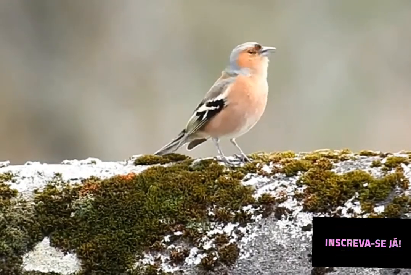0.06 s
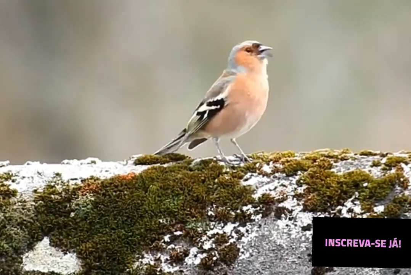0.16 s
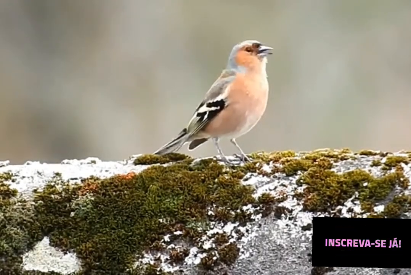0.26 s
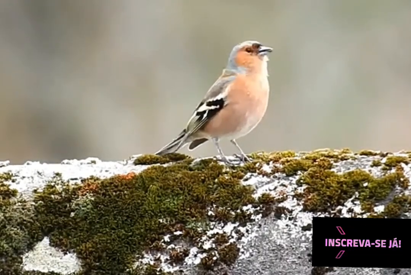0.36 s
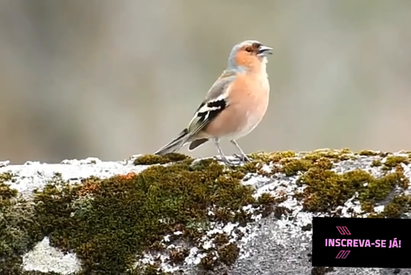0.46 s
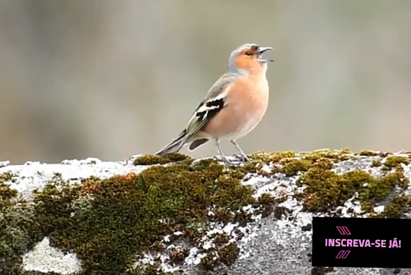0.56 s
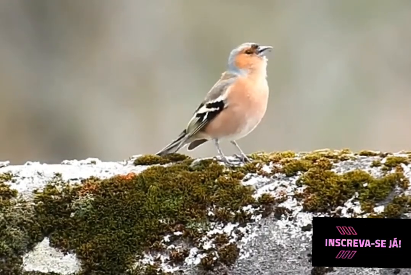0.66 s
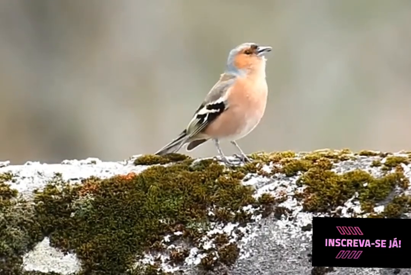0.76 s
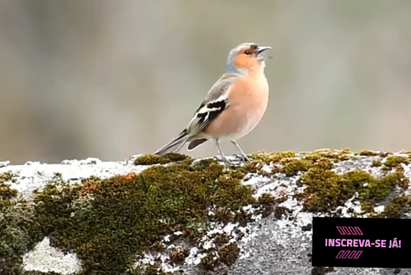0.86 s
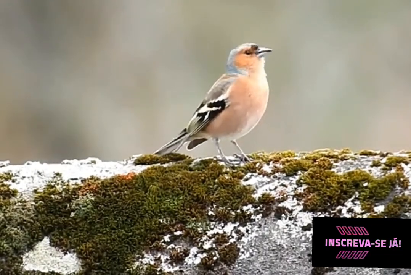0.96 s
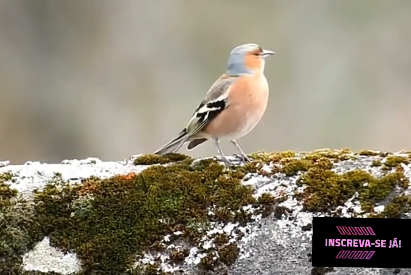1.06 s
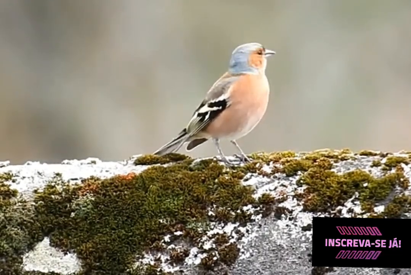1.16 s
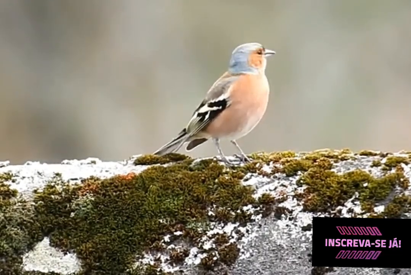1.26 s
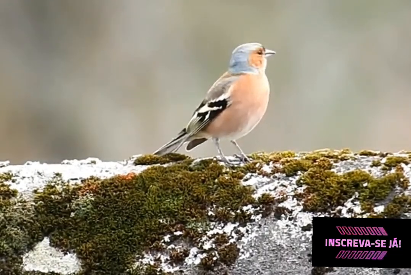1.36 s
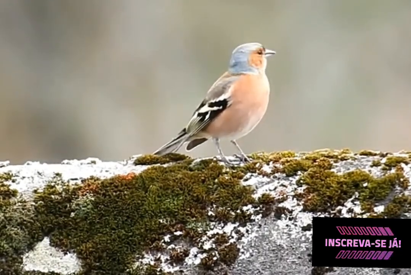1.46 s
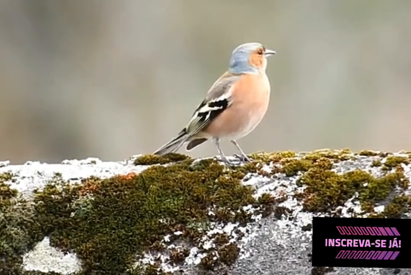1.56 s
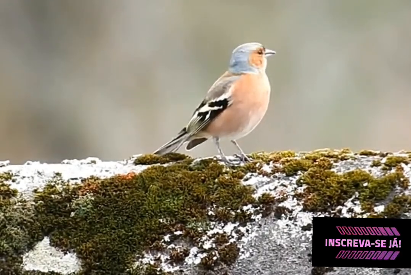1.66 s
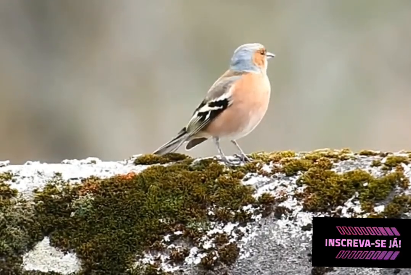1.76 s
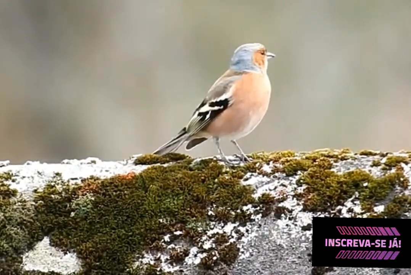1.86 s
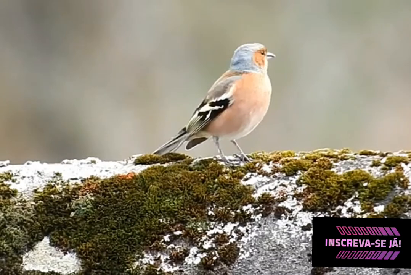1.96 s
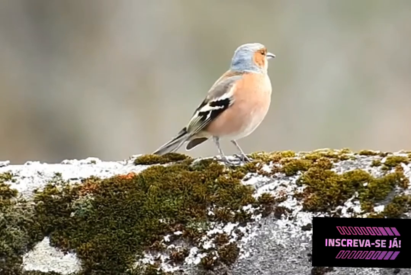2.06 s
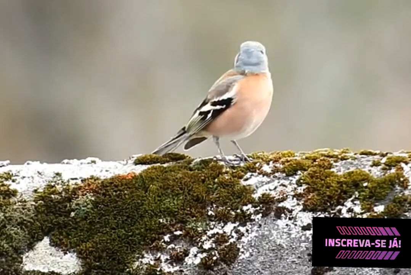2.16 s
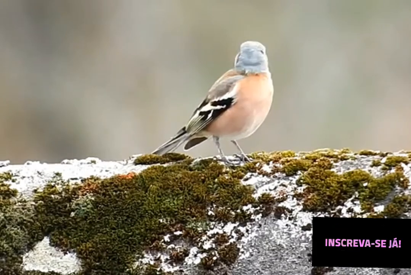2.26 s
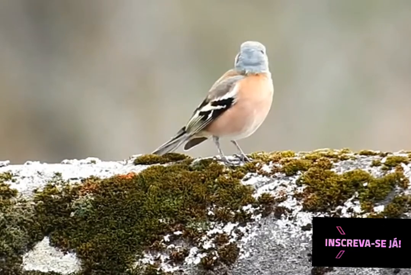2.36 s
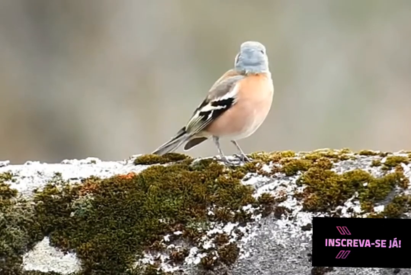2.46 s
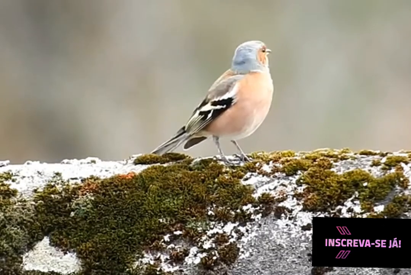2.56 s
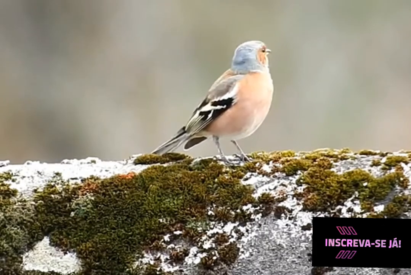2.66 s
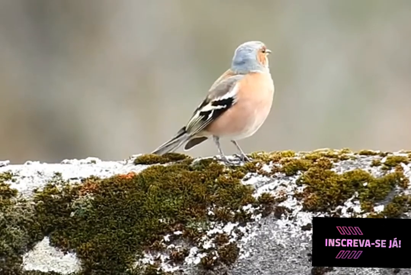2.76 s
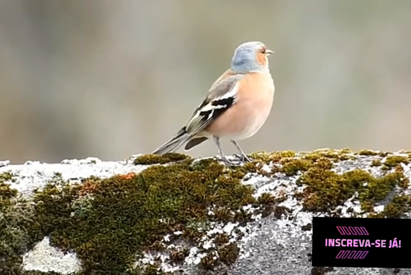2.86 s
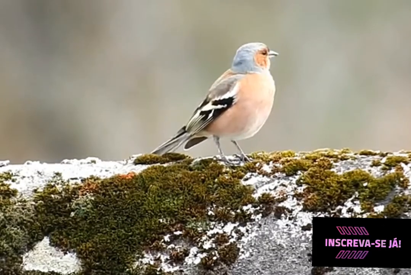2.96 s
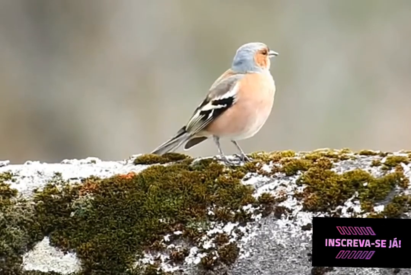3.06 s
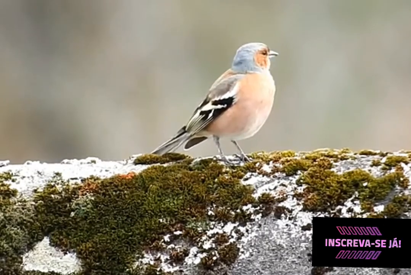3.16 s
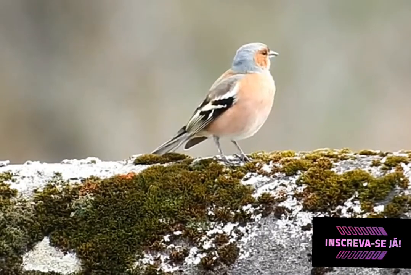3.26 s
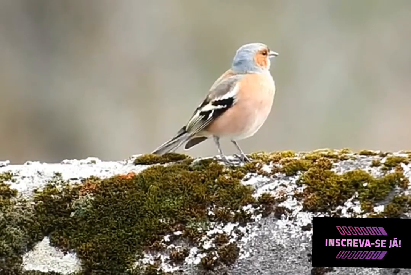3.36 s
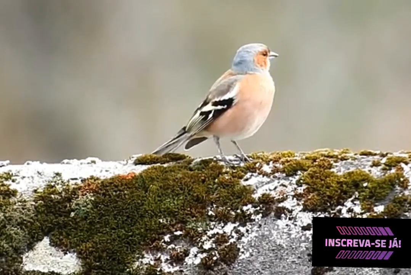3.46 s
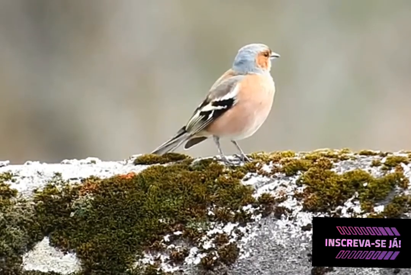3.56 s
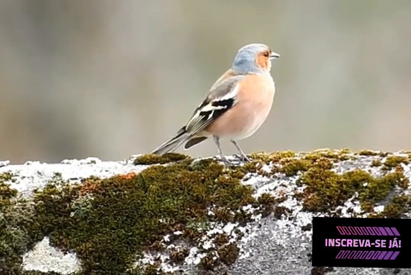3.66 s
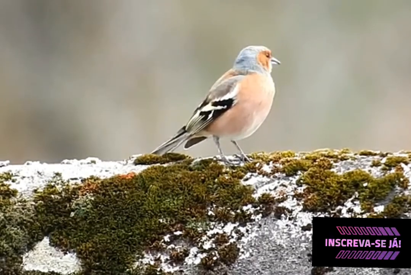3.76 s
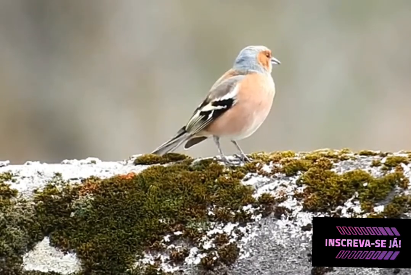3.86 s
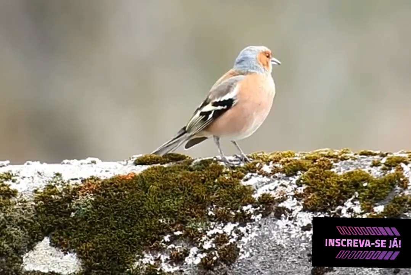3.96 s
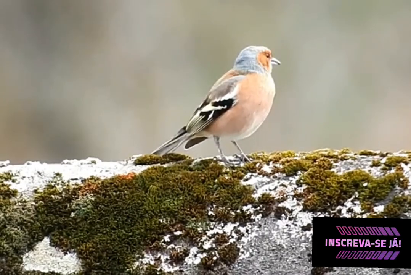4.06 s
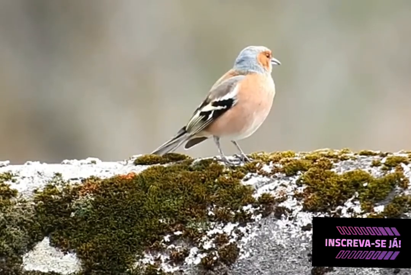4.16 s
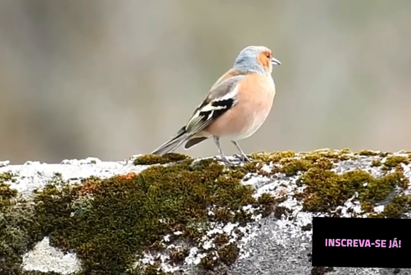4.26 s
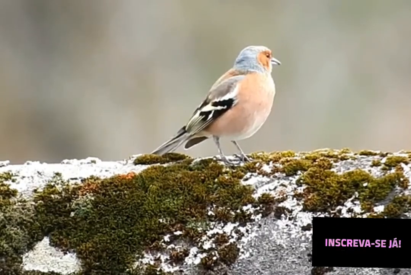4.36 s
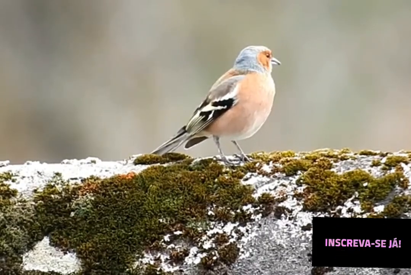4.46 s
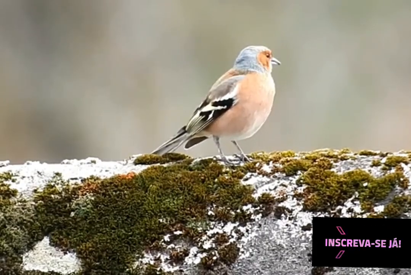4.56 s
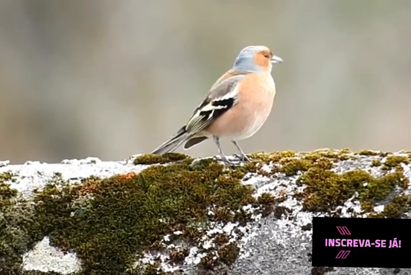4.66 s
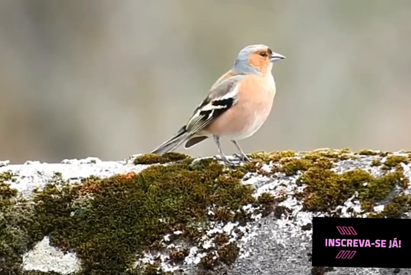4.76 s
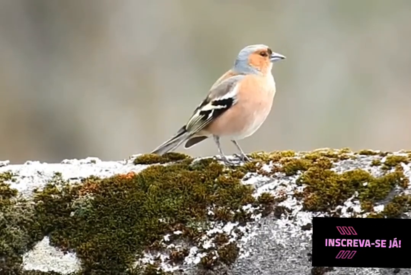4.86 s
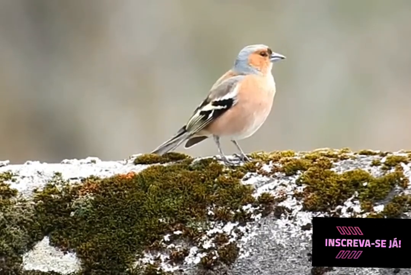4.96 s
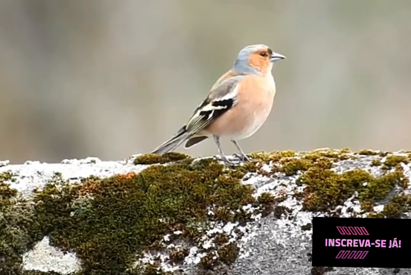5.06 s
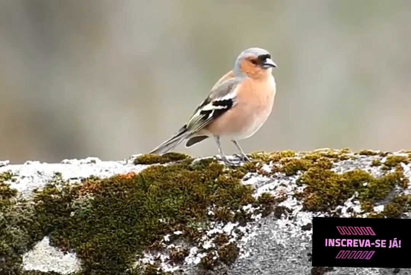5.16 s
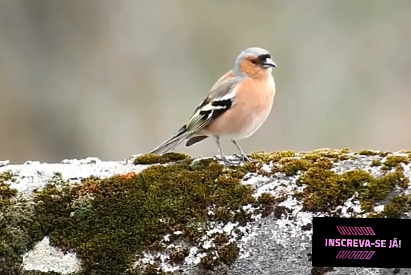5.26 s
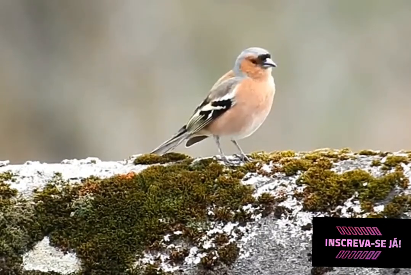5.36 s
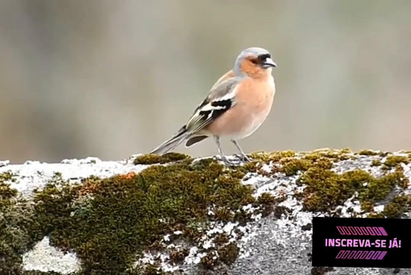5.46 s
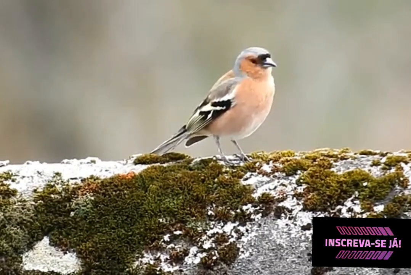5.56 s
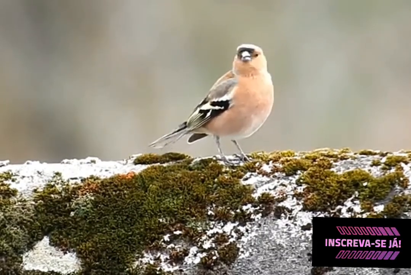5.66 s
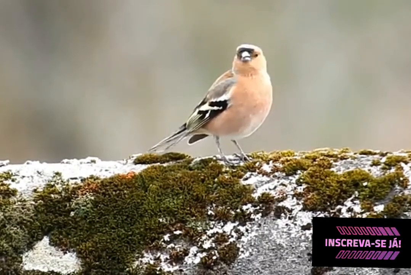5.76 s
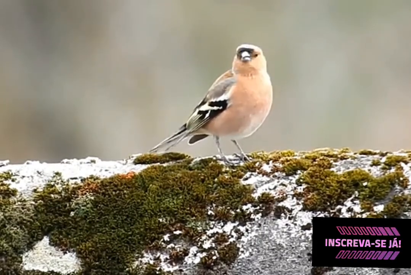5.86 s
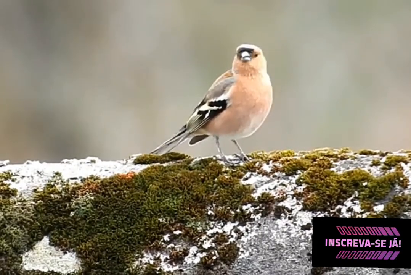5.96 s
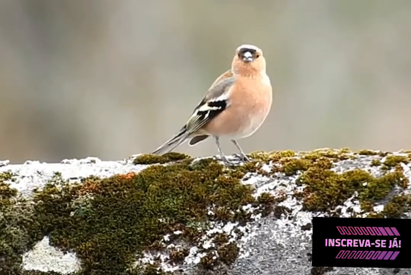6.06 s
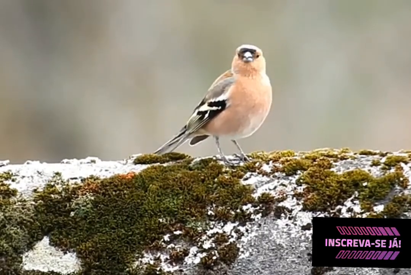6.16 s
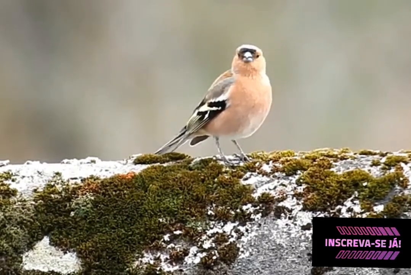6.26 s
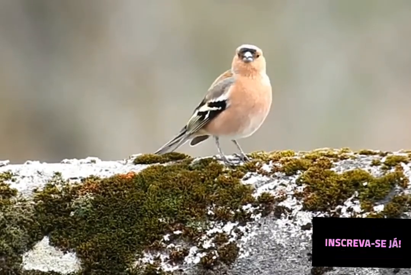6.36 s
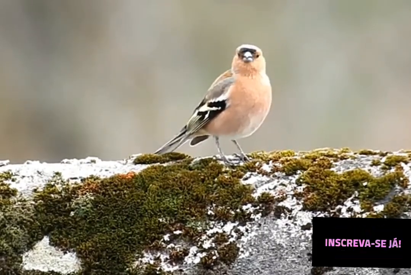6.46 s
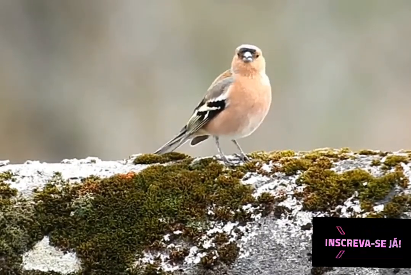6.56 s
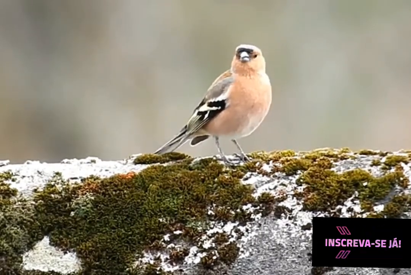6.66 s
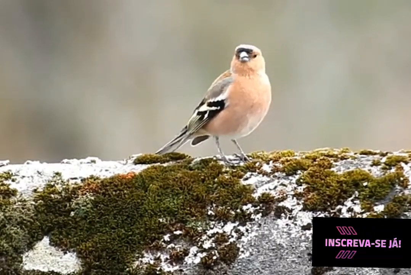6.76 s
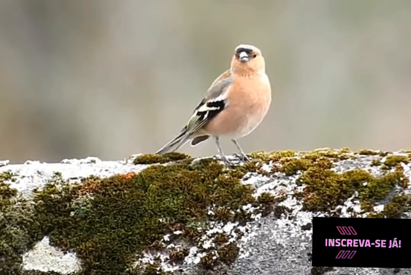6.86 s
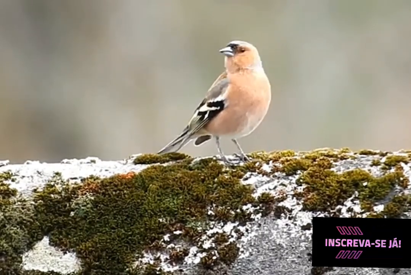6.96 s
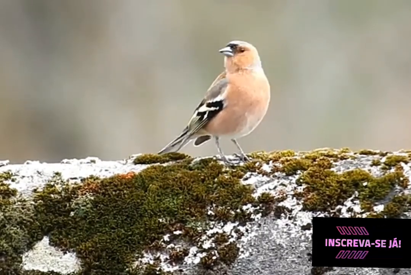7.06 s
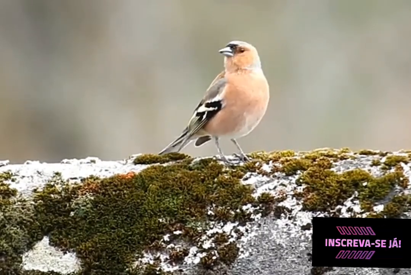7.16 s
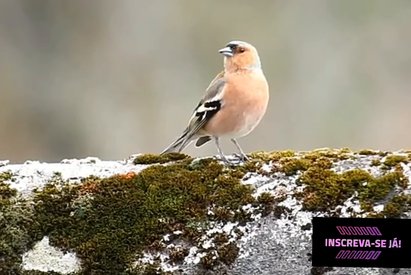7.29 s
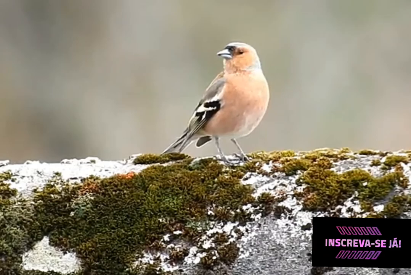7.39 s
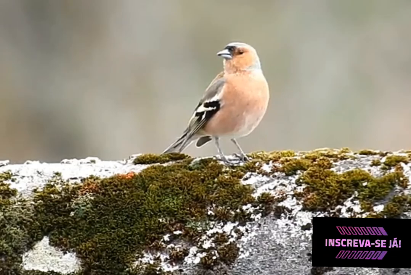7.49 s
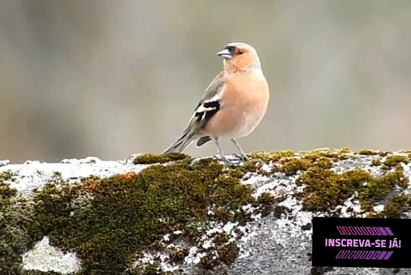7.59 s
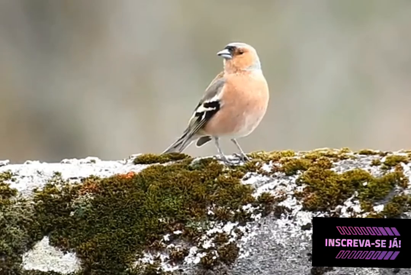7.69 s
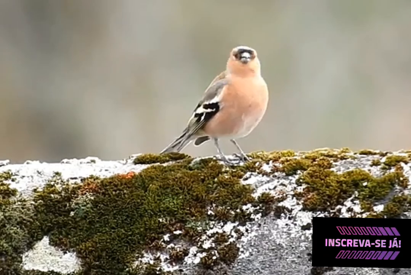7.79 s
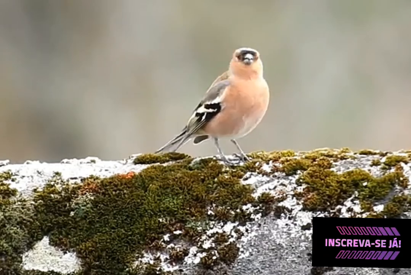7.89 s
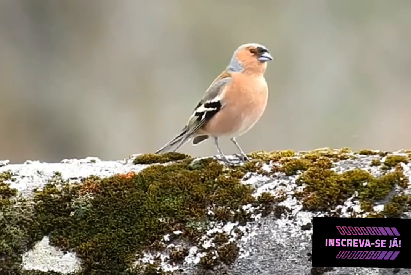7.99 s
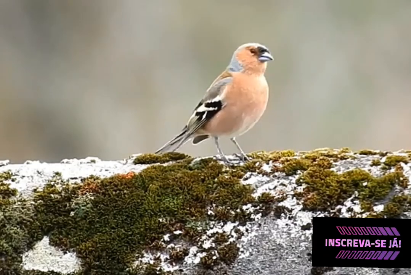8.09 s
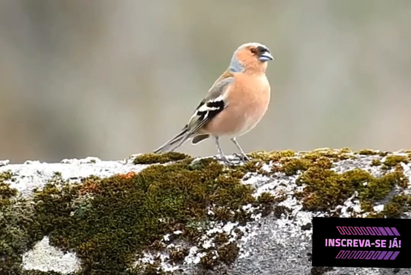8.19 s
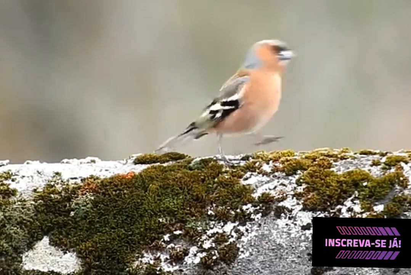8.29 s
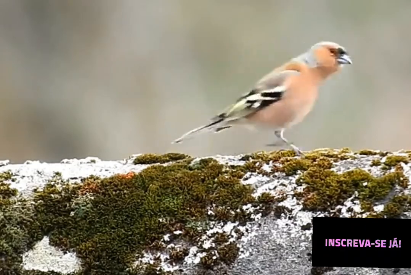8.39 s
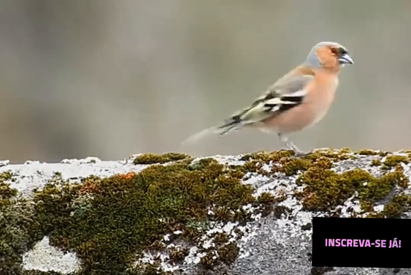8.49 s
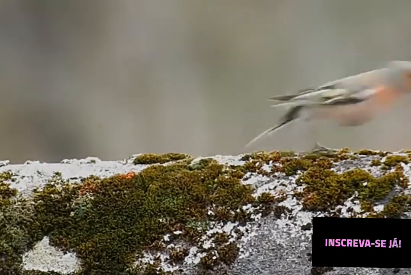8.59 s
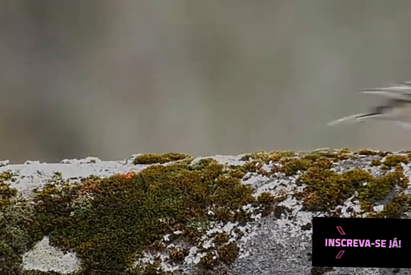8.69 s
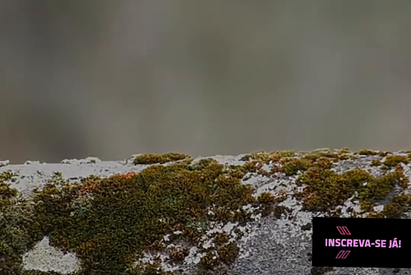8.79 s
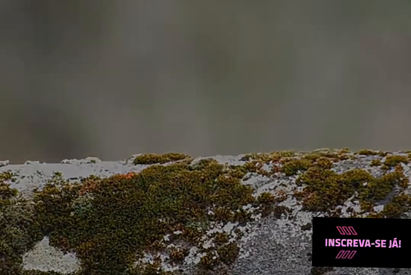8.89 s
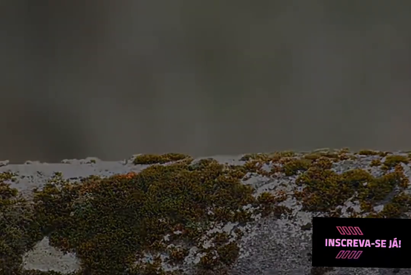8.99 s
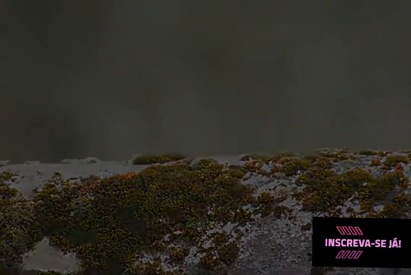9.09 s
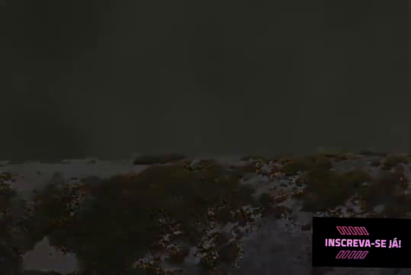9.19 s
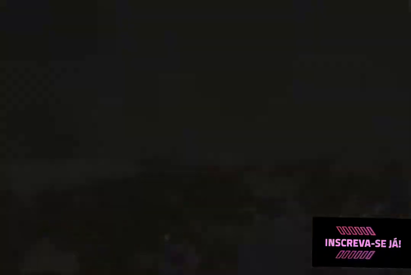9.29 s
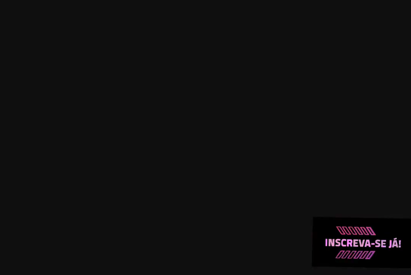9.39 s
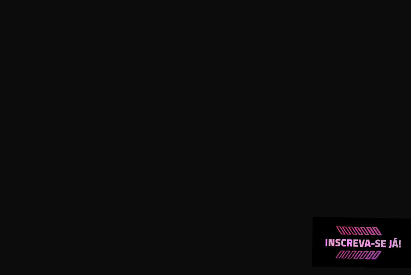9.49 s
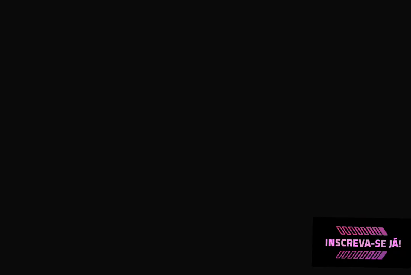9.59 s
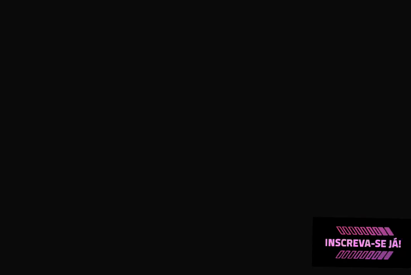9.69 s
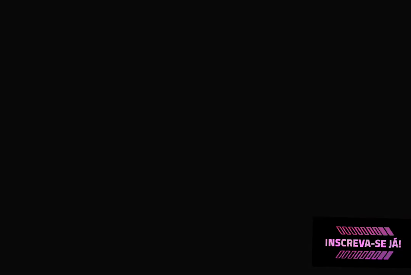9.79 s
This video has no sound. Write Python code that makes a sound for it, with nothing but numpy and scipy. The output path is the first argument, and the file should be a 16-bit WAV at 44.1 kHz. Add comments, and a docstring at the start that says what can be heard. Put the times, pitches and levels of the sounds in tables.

```python
"""A chaffinch close by ends its song at the start: gliding sines, a trill of falling pulses, a last flourish.
A farther tit overlaps it with a two-note call, pauses after 2.7 s and resumes near 7 s; from 2.5 s on come
blurred warbles, an arching call and chirps, and after 8.5 s low hollow notes. Noise tails ring as a wood.
Throughout, banded noise makes a dull rumble that swells and fades, a breeze's rustle (strongest near 9.3 s)
and, over steady hiss, a thin treble shimmer of far twittering; a faint low hum comes and goes after 4.4 s."""
import sys
import numpy as np
from scipy import signal
from scipy.fft import rfft, irfft
from scipy.io import wavfile
from scipy.ndimage import uniform_filter1d

SR = 44100
rng = np.random.default_rng(int(sys.argv[2]) if len(sys.argv) > 2 else 0)


def file_out(sig):
    """Save sig as 16-bit WAV at sys.argv[1]."""
    # one column per channel
    cols = np.atleast_2d(sig).T
    # limit, then scale
    lim = np.clip(cols, -1, 1)
    pcm = np.round(lim * 32767).astype(np.int16)
    wavfile.write(sys.argv[1], SR, pcm)


N = 433490


def from_db(db):
    """Decibels to amplitude gain."""
    return 10 ** (np.asarray(db) / 20)


def rms_one(x):
    """Scales to rms 1."""
    return x / np.sqrt(np.mean(x ** 2) + 1e-20)


def in_time(rows):
    """Interpolates the columns of a time curve, one value a sample."""
    s, *columns = np.transpose(rows)
    return [np.interp(np.arange(N) / SR, s, c) for c in columns]


def at_hz(points, hz):
    """Reads a spectrum on a log-frequency axis."""
    points_hz, points_db = np.transpose(points)
    return np.interp(np.log(hz), np.log(points_hz), points_db)


def filtered(x, order, hz, kind):
    """Butterworth filter."""
    return signal.sosfilt(signal.butter(order, hz, kind, fs=SR, output="sos"), x)


def drift(rate_hz, size):
    """Slow chance: white noise twice through a one-pole low-pass; spread 1."""
    r, run_in = np.exp(-2 * np.pi * rate_hz / SR), int(SR / rate_hz)
    white = rng.standard_normal(size + run_in)
    slow = signal.lfilter([1], [1, -2 * r, r * r], white)[run_in:]
    return slow * np.sqrt((1 - r * r) ** 3 / (1 + r * r))


def stereo(mid, side, side_db):
    """Left and right from a shared and an opposed part."""
    return mid + from_db(side_db) * side * [[1], [-1]]


# stereo width of the noises: f/Hz, side re mid/dB
NOISE_WIDTH = [(30, -21.5), (120, -34), (400, -35), (900, -17.5), (2500, -9), (8000, -0.5), (13000, -4)]


def widened(mid, side, hz):
    """Noise as stereo, its width set by frequency."""
    return stereo(mid, side, at_hz(NOISE_WIDTH, hz))


def banded_noise(spectrum, patchy_db, patch_rate_hz):
    """Narrow bands of stereo noise, each with its own level, flicker and width; rms 1."""
    low_hz, high_hz = spectrum[0][0], spectrum[-1][0]
    edges = np.geomspace(low_hz, high_hz, int(2.5 * np.log2(high_hz / low_hz)) + 2)
    white = rng.standard_normal((2, 2, N))      # neighbouring bands get unrelated noise
    together = drift(patch_rate_hz, size=N)     # gusts that all bands share
    coarse_size = N // 40 + 2       # flicker is drawn every 40 samples
    out = 0
    for k, (low, high) in enumerate(zip(edges, edges[1:])):
        mid, side = filtered(white[k % 2], 2, [low, high], "band")
        centre_hz = np.sqrt(low * high)
        coarse = drift(40 * patch_rate_hz, size=coarse_size)
        patches = np.interp(np.arange(N) / 40, np.arange(coarse_size), coarse)
        level_db = at_hz(spectrum, centre_hz) + patchy_db * (patches + .6 * together)
        out = out + from_db(level_db) * widened(mid, side, centre_hz)
    return rms_one(out)


# air and microphone noise: f/Hz, relative level/dB per Hz
HISS_SPECTRUM = [(25, -10), (50, 2.5), (100, 6.5), (300, 0.5), (1200, 1), (2400, -14), (6000, -22),
                 (9000, -13), (12000, -14.5), (15000, -23.5)]
HISS_RMS_DB = -74.5


def hiss():
    """Steady noise, coloured by scaling the spectrum of white noise."""
    hz = np.maximum(np.fft.rfftfreq(N, 1 / SR), 1)
    mid, side = rfft(rng.standard_normal((2, N))) * from_db(at_hz(HISS_SPECTRUM, hz)) * (hz > 20)
    return from_db(HISS_RMS_DB) * rms_one(irfft(widened(mid, side, hz), N))


# hum curve: t/s, level/dB
HUM_LEVEL = [(0, -100), (4.4, -100), (5.1, -89), (6, -103), (7.2, -80), (8.2, -80), (8.8, -98), (9.6, -74)]
HUM_HZ, HUM_WAVER_HZ, HUM_FLUTTER_DB = 54, 3.9, 2.5


def hum():
    """Faint low sine, wavering in pitch and level."""
    pitch_hz = HUM_HZ + HUM_WAVER_HZ * drift(3.0, size=N)
    level_db = in_time(HUM_LEVEL)[0] + HUM_FLUTTER_DB * drift(2.5, size=N)
    return from_db(level_db) * np.sin(2 * np.pi * np.cumsum(pitch_hz) / SR)


# rumble colour: f/Hz, relative level/dB per Hz
RUMBLE_SPECTRUM = [(35, -31), (60, -10), (115, -13), (140, -7.5), (220, -0.5), (330, -5.5), (560, 1),
                   (720, -12), (1000, -28)]
# rumble curve: t/s, upper level/dB, deep level/dB
RUMBLE_CURVE = [(0.0, -70, -80.5), (0.66, -64, -74), (0.93, -76, -78), (1.53, -70, -83), (2.05, -47, -54.5),
                (2.49, -64, -78), (2.57, -55, -69.5), (2.9, -64.5, -78), (3.06, -51.5, -70),
                (3.34, -74, -86.5), (4.05, -72.5, -82), (4.6, -48.5, -61.5), (5.75, -76, -81),
                (6.16, -62.5, -71), (6.6, -72.5, -77), (7.61, -64, -77), (7.77, -74.5, -86),
                (7.99, -59.5, -55.5), (8.16, -71.5, -82), (8.79, -71, -83), (9.04, -59.5, -64),
                (9.28, -62, -72.5), (9.64, -51.5, -59), (9.83, -75, -68)]
RUMBLE_SPLIT_HZ = 180


def rumble():
    """Dull noise split in two bands that swell and fade on their own curves."""
    upper_db, deep_db = in_time(RUMBLE_CURVE)
    noise = banded_noise(RUMBLE_SPECTRUM, patchy_db=2.0, patch_rate_hz=6.0)
    upper = rms_one(filtered(noise, 4, RUMBLE_SPLIT_HZ, "high"))
    deep = rms_one(filtered(noise, 4, RUMBLE_SPLIT_HZ, "low"))
    return from_db(upper_db) * upper + from_db(deep_db) * deep


# rustle colour: f/Hz, relative level/dB per Hz
RUSTLE_SPECTRUM = [(350, -36), (600, -16.5), (811, -4.5), (1030, 1), (1960, -8), (2820, -21), (4000, -26),
                   (5200, -53), (8800, -120)]
# rustle curve: t/s, level before brightening/dB, gain of the upper part/dB
RUSTLE_CURVE = [(0, -62, -0.5), (.5, -65.5, -4.5), (.82, -74, -10.5), (1.5, -74, 1), (1.65, -66.5, -0.5),
                (2.2, -72, -5), (3.0, -63.5, 1), (3.6, -68, -5), (3.85, -62.5, -3.5), (4.55, -62, 0.5),
                (5.04, -68, -11), (5.6, -59, -6), (5.94, -62.5, -11.5), (6.25, -54.5, 4), (7.09, -63, -3.5),
                (7.6, -58, 4), (8.1, -62.5, 6), (8.8, -57, -4), (9.33, -48, 6), (9.83, -59, 1)]
CRISP_FROM_HZ = 1500


def rustle():
    """Leaves in a breeze: patchy noise of changing level and brightness."""
    level_db, bright_db = in_time(RUSTLE_CURVE)
    leaves = from_db(level_db) * banded_noise(RUSTLE_SPECTRUM, patchy_db=3.0, patch_rate_hz=9.0)
    crisp = filtered(leaves, 4, CRISP_FROM_HZ, "high")
    return leaves + (from_db(bright_db) - 1) * crisp    # drier leaves lift the upper part


# shimmer colour: f/Hz, relative level/dB per Hz
SHIMMER_SPECTRUM = [(3200, -28.5), (4300, -15.5), (5300, -3), (6600, -8), (7500, -12), (9000, -29)]
# shimmer curve: t/s, level/dB
SHIMMER_LEVEL = [(1.3, -89.5), (2.3, -88.5), (2.96, -81), (4.13, -79.5), (4.6, -70.5), (4.98, -79.5),
                 (5.65, -72.5), (6.05, -72.5), (6.36, -67), (7.3, -72.5), (8.76, -75), (9.23, -65.5),
                 (9.83, -69)]


def shimmer():
    """Far twittering blurred into flickering treble noise."""
    noise = banded_noise(SHIMMER_SPECTRUM, patchy_db=2.1, patch_rate_hz=12.0)
    return from_db(in_time(SHIMMER_LEVEL)[0]) * noise


def wood(x, close_t60_s, close_db, far_t60_s, far_db, reach_s, side_db):
    """Echoes from countless trunks as a short and a long noise tail; the long one stops where the trees end."""
    t = np.arange(SR // 2) / SR
    close = from_db(-60 * t / close_t60_s) * (1 - np.exp(-(t / 0.0039) ** 2))
    far = from_db(-60 * t / far_t60_s) * (1 - np.exp(-(t / 0.024) ** 2))
    far = far * np.exp(-(t / reach_s) ** 4)
    shape = from_db(close_db) * close / np.linalg.norm(close) + from_db(far_db) * far / np.linalg.norm(far)
    bright = rng.standard_normal((2, len(t))) * shape
    dull = filtered(bright, 4, 5200, "low")
    mid, side = dull + (bright - dull) * from_db(-60 * t / 1.3)     # leaves take the treble first
    return signal.fftconvolve(x[None], stereo(mid, side, side_db), axes=1)[:, :N]


# chaffinch overtones, read at the overtone's own frequency: f/Hz, level re fundamental/dB
OVERTONE_LEVEL = [(4000, -58), (6500, -52), (8300, -41), (10000, -52), (11200, -59), (12500, -45),
                  (14000, -64)]


def add(out, note, fade_s, waver_hz=0, flutter_db=0, partials=()):
    """Whistles one note (t/s, f/Hz, level/dB rms) into out: a sine with soft ends, waver and faint overtones."""
    s, hz, level_db = np.transpose(note)
    first, last = s.min(), s.max()
    i = np.arange(max(int((first - fade_s) * SR), 0), min(int((last + fade_s) * SR), N))
    t = i / SR
    pitch = np.interp(t, s, hz) + waver_hz * drift(150, size=len(i))
    phase = 2 * np.pi * (np.cumsum(pitch) / SR + rng.random())
    outside_s = np.maximum(first - t, t - last)
    ends = np.sin(np.pi / 2 * np.clip(1 - outside_s / fade_s, 0, 1)) ** 2
    level = from_db(np.interp(t, s, level_db) + flutter_db * drift(250, size=len(i)))
    level = uniform_filter1d(uniform_filter1d(level, size=15), size=15)     # muscles cannot turn sharp corners
    tone = np.sin(phase)
    for k in partials:
        tone = tone + from_db(at_hz(OVERTONE_LEVEL, k * pitch)) * np.sin(k * phase)
    out[i] += np.sqrt(2) * ends * level * tone


def glide(row, swell_db, fade_db):
    """Draws a note row as points (t/s, f/Hz, level/dB): three pitches, level falling both ways from the peak."""
    s, swell_ms, fade_ms, start_hz, loud_hz, end_hz, level_db = row
    u = np.linspace(-1, 1, 9)       # start, loudest, end at -1, 0, 1
    times = s + u * np.where(u < 0, swell_ms, fade_ms) / 1000
    pitch = np.interp(u, [-1, 0, 1], [start_hz, loud_hz, end_hz])
    level = level_db - np.where(u < 0, swell_db, fade_db) * np.abs(u) ** 1.6
    return np.transpose([times, pitch, level])


def repeated(phrase, s, level_db):
    """Note rows of a phrase, shifted to time s and in level."""
    return list(np.array(phrase) + [s, 0, 0, 0, 0, 0, level_db])


def placed(shape, s, level_db, tuning=1):
    """A note shape in ms set at time s, shifted in level, pitch scaled."""
    return np.array(shape) * [1 / 1000, tuning, 1] + [s, 0, level_db]


# blurred warbles: loudest t/s, swell/ms, fade/ms, start f/Hz, loudest f/Hz, end f/Hz, relative level/dB
FAR_WARBLES = [(2.58, 80, 57, 7480, 6820, 6940, -62.5), (3.06, 15, 62, 6130, 6050, 5500, -76),
               (3.39, 90, 10, 5560, 5000, 5000, -71), (3.51, 50, 15, 2680, 2300, 2240, -61.5),
               (4.419, 40, 53, 6700, 6000, 5260, -57), (4.44, 15, 80, 4360, 4280, 3680, -55),
               (4.8, 20, 210, 5410, 5500, 6280, -73), (5.19, 15, 32, 5950, 5900, 5690, -70.5),
               (5.935, 10, 25, 4460, 4510, 4570, -71), (6.259, 15, 76, 6670, 6680, 6680, -68),
               (6.429, 20, 22, 6100, 5400, 4700, -55), (6.64, 20, 23, 4670, 4500, 4290, -66.5),
               (7.349, 20, 75, 5200, 5100, 4780, -67.5), (8.289, 30, 30, 4600, 3750, 2860, -56.5),
               (9.35, 80, 20, 6840, 5750, 5520, -61.5), (9.8, 60, 34, 6820, 7200, 7270, -61.5)]


def far_warbles():
    """Notes that swell and fade, their pitch smeared by distance."""
    out = np.zeros(N)
    for row in FAR_WARBLES:
        add(out, glide(row, swell_db=7, fade_db=10), .025, waver_hz=420, flutter_db=4.0)
    return out


# hollow notes: t/s, length/s, start f/Hz, end f/Hz, relative level at start/dB
HOLLOW_NOTES = [(8.5, 0.036, 1030, 1038, -55.5), (8.765, 0.0237, 1170, 990, -49),
                (9.055, 0.022, 857, 865, -47.5), (9.272, .045, 3004, 2820, -52.5),
                (9.32, 0.128, 920, 915, -47.5), (9.33, 0.044, 1280, 1240, -44),
                (9.336, 0.036, 2760, 2790, -49), (9.368, 0.048, 1900, 1810, -51)]
HOLLOW_FADE_DB = 10


def hollow_notes():
    """Mostly low notes from afar, loudest at the start."""
    out = np.zeros(N)
    for s, length_s, start_hz, end_hz, level_db in HOLLOW_NOTES:
        note = [(s, start_hz, level_db), (s + length_s, end_hz, level_db - HOLLOW_FADE_DB)]
        add(out, note, .012, waver_hz=70, flutter_db=3.0)
    return out


# single chirps: loudest t/s, swell/ms, fade/ms, start f/Hz, loudest f/Hz, end f/Hz, level/dB
CHIRP_NOTES = [(3.918, 5, 10, 2850, 2730, 2340, -64), (4.037, 3, 14, 2634, 2770, 3114, -51.5),
               (4.13, 66, 25, 3050, 3300, 3410, -62.5), (4.255, 15, 30, 3060, 2820, 2600, -58),
               (4.36, 55, 28, 2530, 2555, 2530, -63.5), (4.365, 35, 19, 5590, 6120, 5900, -57),
               (4.41, 20, 15, 5900, 6240, 6570, -58), (4.445, 7.6, 91, 3030, 3120, 3440, -55),
               (4.45, 22, 38, 4730, 4910, 4800, -55), (4.47, 18, 20, 4280, 4180, 4480, -55),
               (4.505, 35, 16, 4810, 4280, 4280, -50), (4.56, 34, 12, 4380, 4890, 4600, -55.5),
               (4.595, 32, 22, 4530, 4100, 3780, -55), (4.69, 15, 18, 5050, 5150, 5220, -60),
               (4.735, 14.4, 46, 3230, 3100, 2820, -57), (4.875, 38, 12, 2765, 2815, 2750, -53.5),
               (4.905, 15, 30, 2740, 2577, 2530, -54), (5.035, 23, 52, 4310, 3750, 3810, -57),
               (5.17, 30, 40, 2660, 2650, 2620, -67), (5.255, 45, 22, 2750, 3010, 3000, -54),
               (6.75, 36, 50, 5110, 4750, 4860, -55.5), (6.912, 15, 15, 3290, 3650, 4200, -48),
               (6.93, 35, 20, 3500, 4710, 4600, -46), (6.94, 14, 29, 4180, 4370, 3430, -38),
               (6.974, 17, 6.5, 4700, 4200, 3870, -37.5), (6.995, 24, 19, 3650, 3405, 3320, -39.5),
               (7.77, 20, 3, 4250, 4730, 4750, -59.5), (7.82, 50, 30, 3700, 3860, 3800, -60),
               (8.12, 47, 11, 4550, 4540, 4570, -54.5), (8.3, 42, 44, 3870, 3784, 3850, -55.5),
               (8.94, 24, 27, 2990, 2985, 2990, -50.5), (9.055, 30, 10, 4360, 4220, 4080, -53)]
# rising arch, short high fall, low note; same columns, t from the arch's top, level relative
ARCH_CALL_NOTES = [(-.02, 14.3, 14, 2860, 3720, 3700, -17), (-.01, 23, 41, 3500, 4530, 4540, -21),
                   (0, 16, 10, 4030, 4270, 4116, -1), (.03, 14.55, 33, 3980, 3470, 3920, -14.5),
                   (.036, 17, 10.7, 4550, 4370, 3980, -3.5)]
# arch calls: t/s, level/dB
ARCH_CALL_TIMES = [(3.432, -31.5), (8.944, -33.5)]


def chirping_birds():
    """Grainy gliding chirps and an arching call heard twice."""
    out, notes = np.zeros(N), list(CHIRP_NOTES)
    for s, level_db in ARCH_CALL_TIMES:
        notes += repeated(ARCH_CALL_NOTES, s, level_db)
    for row in notes:
        add(out, glide(row, swell_db=14, fade_db=15), .004, waver_hz=49, flutter_db=3.0)
    return out


# tit note shapes: t/ms, f/Hz, relative level/dB
HIGH_NOTE_SHAPE = [(-1.5, 5500, -17), (1.5, 4700, -3.5), (6, 4050, -2), (45, 4020, -6), (70.5, 4000, -9)]
LOW_NOTE_SHAPE = [(0, 3400, -6.5), (19.4, 3330, -0.5), (47.4, 3280, 3), (100.2, 3260, -4.5)]
# tit calls: high note t/s, high level/dB, low level/dB, snap at the high note's start/dB
TIT_CALLS = [(0.919, -44.5, -61, -14), (1.34, -74, -70, -7.5), (1.774, -67.5, -71.5, -0.5),
             (2.215, -70, -75, 3), (2.665, -65.5, -77, -3), (7.098, -49, -65, -28), (7.511, -53, -58.5, 0),
             (7.939, -47.5, -58.5, 2), (8.393, -48.5, -51, 0), (8.826, -48, -54.5, 0),
             (9.263, -50.5, -54, -1), (9.716, -47, -55, 2)]
LOW_NOTE_LEAD_S = .154


def tit():
    """Clear two-note call, low note first; the high one starts with its own snap."""
    out = np.zeros(N)
    for s, high_db, low_db, snap_db in TIT_CALLS:
        high = placed(HIGH_NOTE_SHAPE, s, high_db)
        high[:2, 2] += snap_db
        add(out, high, .0015, waver_hz=16, flutter_db=3.0)
        low = placed(LOW_NOTE_SHAPE, s - LOW_NOTE_LEAD_S, low_db)
        add(out, low, .0015, waver_hz=18, flutter_db=2.0)
    return out


# trill pulse, a fast fall flaring at its end: t/ms, f/Hz, relative level/dB
PULSE_SHAPE = [(-2.5, 6800, -31.5), (0.35, 6100, -15), (0.5, 5400, -19), (2, 4770, 0), (3, 3900, -22)]
TRILL_PULSES, TRILL_START_S, TRILL_STEP_S = 16, .6788, .00865
TRILL_RUSH_S = .0025    # later pulses come early by up to this
TRILL_DB, TRILL_SOFT_START_DB, TRILL_UNEVEN_DB = -12, 12, 1.5
TRILL_GROWS_PULSES = 2.7
TRILL_SAG = .11         # share of pitch lost by the last pulse


def trill(out):
    """Adds very short falling pulses that grow at first and sink in pitch toward the end."""
    for k in range(TRILL_PULSES):
        fresh = np.exp(-k / TRILL_GROWS_PULSES)
        s = TRILL_START_S + k * TRILL_STEP_S - TRILL_RUSH_S * (1 - fresh)
        level_db = TRILL_DB - TRILL_SOFT_START_DB * fresh + TRILL_UNEVEN_DB * rng.standard_normal()
        tuning = 1 - TRILL_SAG * (k / (TRILL_PULSES - 1)) ** 3
        add(out, placed(PULSE_SHAPE, s, level_db, tuning), .0005, partials=(2, 3))


# song notes: loudest t/s, swell/ms, fade/ms, start f/Hz, loudest f/Hz, end f/Hz, level/dB
SONG_NOTES = [(.209, 16, 6, 2853, 3275, 3780, -31.5), (.228, 17, 42, 3410, 2920, 1845, -33.5),
              (.357, 18.7, 4, 3040, 3970, 4640, -27.5), (.372, 14.8, 40, 3360, 2900, 1925, -31),
              (.492, 4.6, 3, 7675, 4700, 4200, -19), (.498, 4.6, 10, 6385, 4840, 3940, -20),
              (.585, 57, 12, 1850, 2680, 3480, -32.5), (.608, 8, 30, 3150, 2887, 2800, -35),
              (.822, 11.3, 26, 3940, 3350, 2026, -29.5), (.87, 25.5, 5, 2116, 3846, 3760, -28.5),
              (.884, 10, 36.5, 3750, 3320, 2627, -30), (.937, 36, 38, 2750, 2150, 1730, -41),
              (1.045, 4.2, 2, 4300, 4600, 4680, -36), (1.047, 1.6, 2, 5930, 6100, 6340, -48),
              (1.053, 5.6, 14, 4200, 4800, 3440, -19), (1.067, 2, 2, 6500, 6200, 5700, -48),
              (1.073, 4.6, 15.5, 4720, 4250, 3700, -23.5), (1.134, 13, 18, 3704, 4350, 3990, -35),
              (1.18, 28, 10, 4150, 4450, 4050, -33.5)]
# syllable sung twice; same columns, t from its upward flick, level relative
FLICK_SYLLABLE = [(-.008, 16, 7.4, 3066, 3130, 3340, -8.5), (.002, 4.5, 4.5, 3450, 4330, 5280, -7),
                  (.027, 13, 18, 3500, 3460, 3450, 0)]
# syllable times: t/s, level/dB
FLICK_TIMES = [(0.016, -27), (.111, -26)]


def chaffinch():
    """Slightly hoarse whistled glides with overtones, and the trill."""
    out, notes = np.zeros(N), list(SONG_NOTES)
    for s, level_db in FLICK_TIMES:
        notes += repeated(FLICK_SYLLABLE, s, level_db)
    for row in notes:
        note = glide(row, swell_db=19.5, fade_db=14)
        add(out, note, .0015, waver_hz=60, flutter_db=2.5, partials=(2, 3, 4))
    trill(out)
    return out


def scene():
    """Singer a little right, neighbours further right, far calls central, all ringing in the wood."""
    background = rumble() + rustle() + shimmer() + hiss() + hum()
    far = far_warbles() + hollow_notes()
    others = chirping_birds() + tit()
    near = chaffinch()
    far_wood = wood(others + from_db(1.5) * far, close_t60_s=.07, close_db=-4,
                    far_t60_s=.5, far_db=-8.5, reach_s=.18, side_db=-7)
    near_wood = wood(near, close_t60_s=.08, close_db=-2.5,
                     far_t60_s=.41, far_db=-2, reach_s=.21, side_db=-10.5)
    rest = others * from_db([[-1.2], [1.2]]) + from_db(-7.0) * far + far_wood
    singer = near * from_db([[-.4], [.4]]) + near_wood      # rows: right channel sits higher
    singer = singer
    return background + rest + singer


CUTOFF_HZ = 14900


def record(dry):
    """Cuts the top with a steep elliptic low-pass."""
    return signal.sosfilt(signal.ellip(12, .5, 60, CUTOFF_HZ, fs=SR, output="sos"), dry)


dry = scene()
out = record(dry)
file_out(out)
```